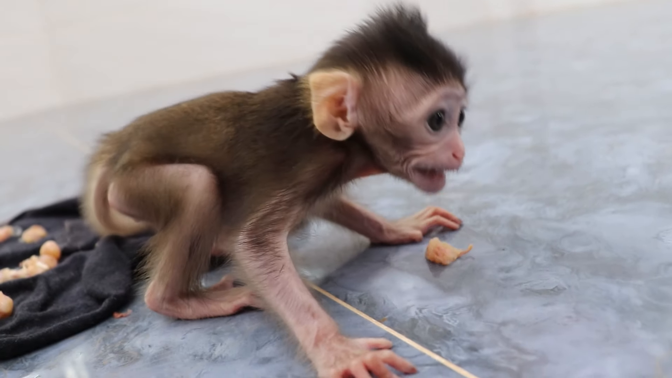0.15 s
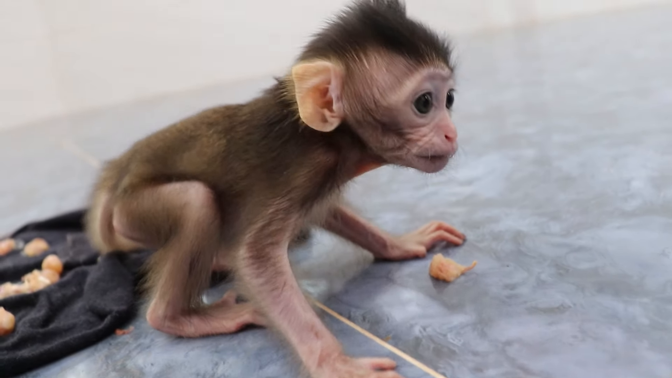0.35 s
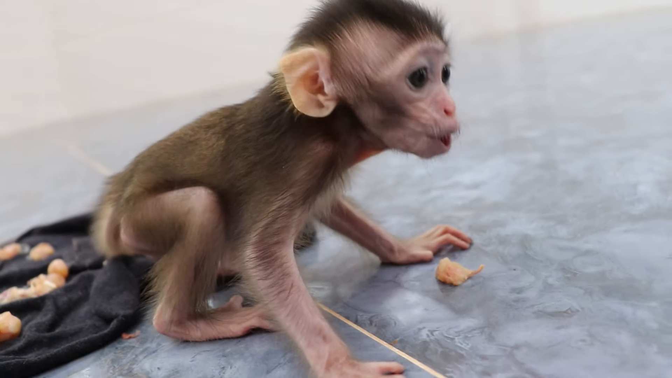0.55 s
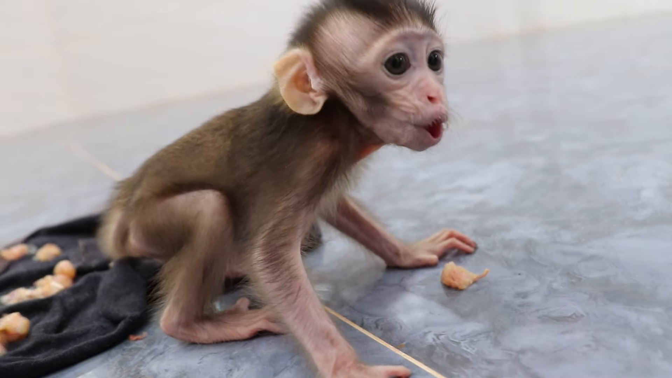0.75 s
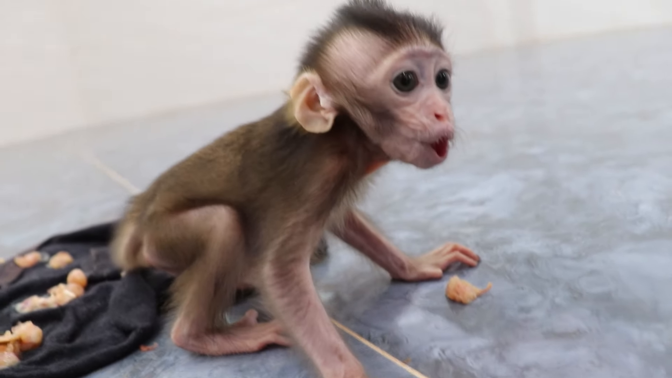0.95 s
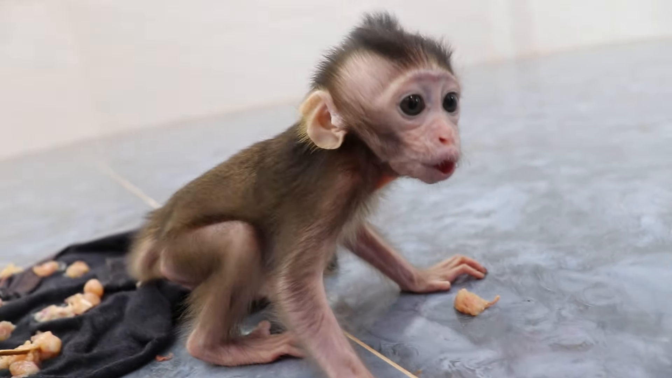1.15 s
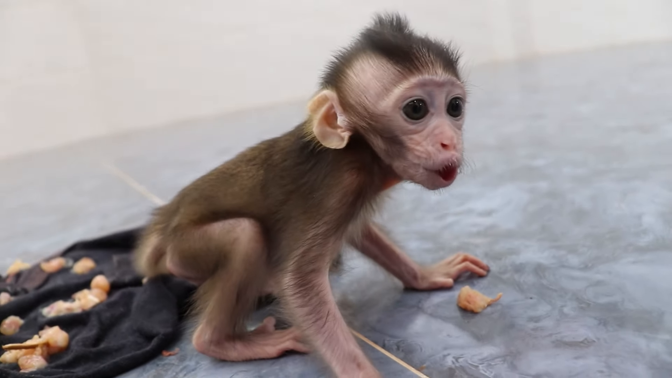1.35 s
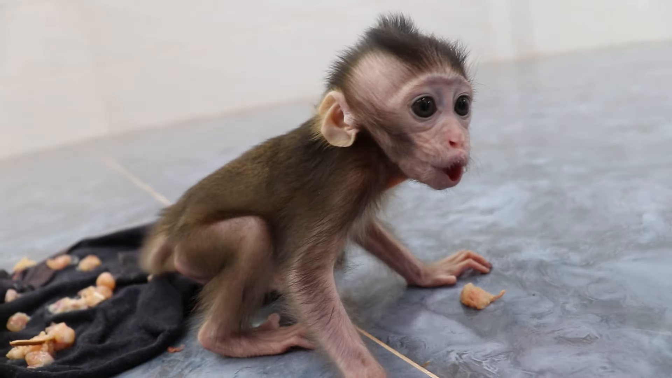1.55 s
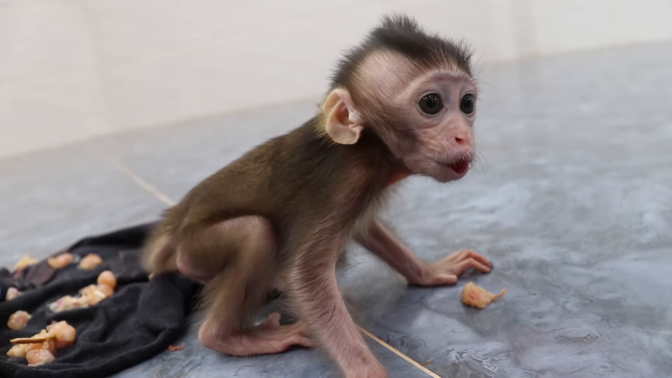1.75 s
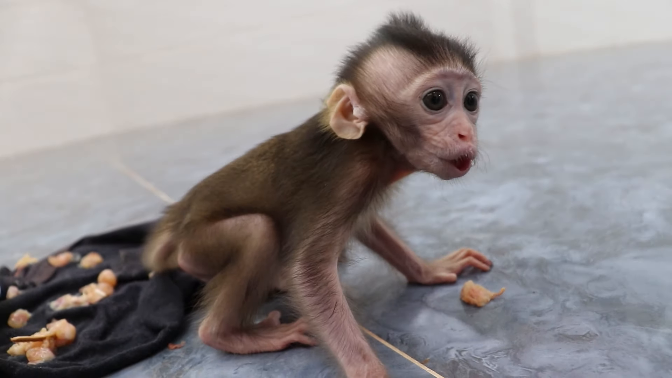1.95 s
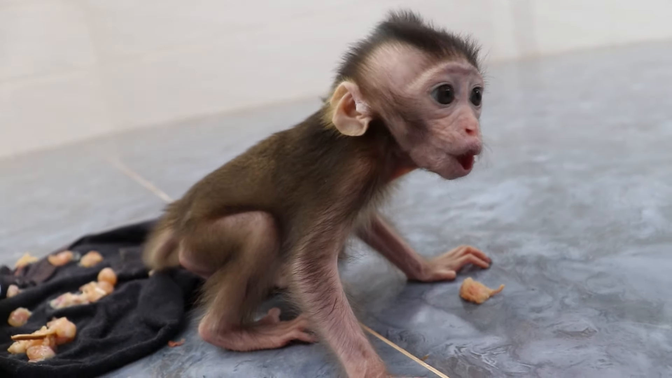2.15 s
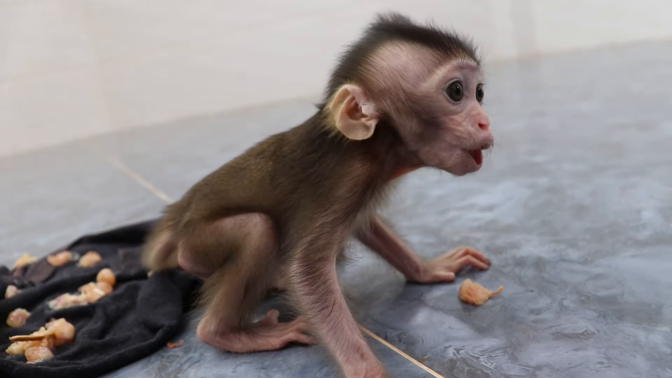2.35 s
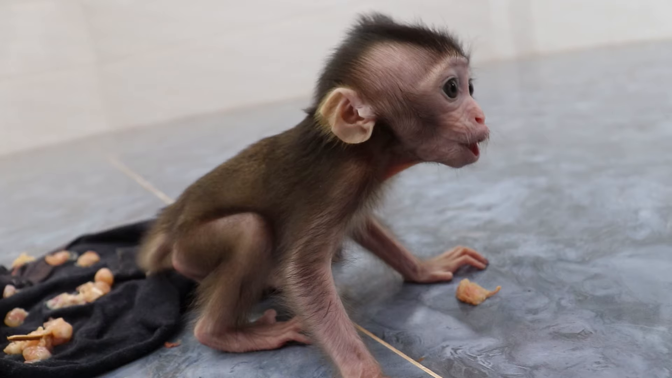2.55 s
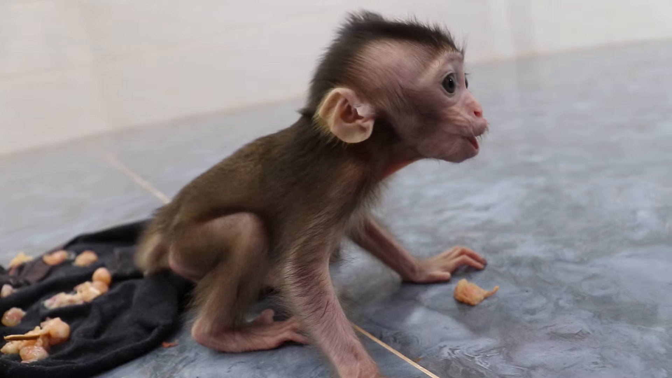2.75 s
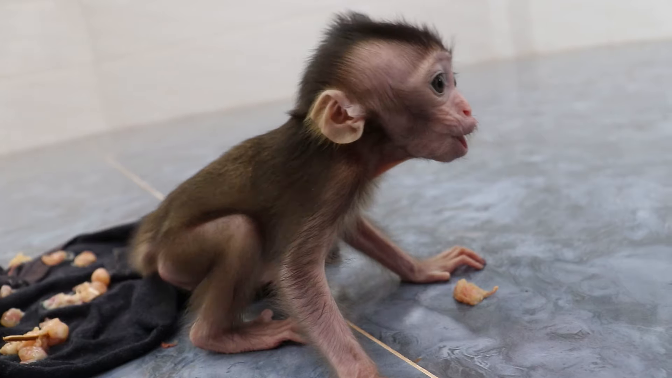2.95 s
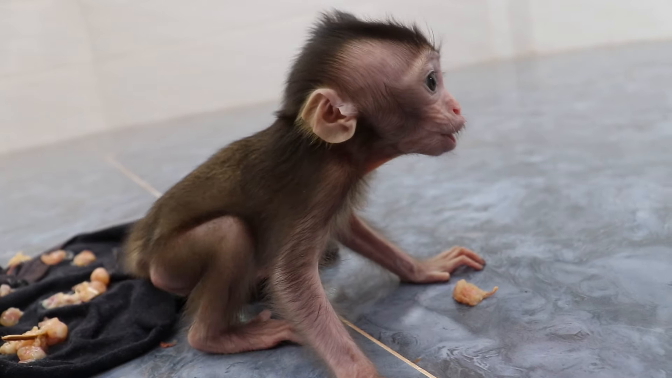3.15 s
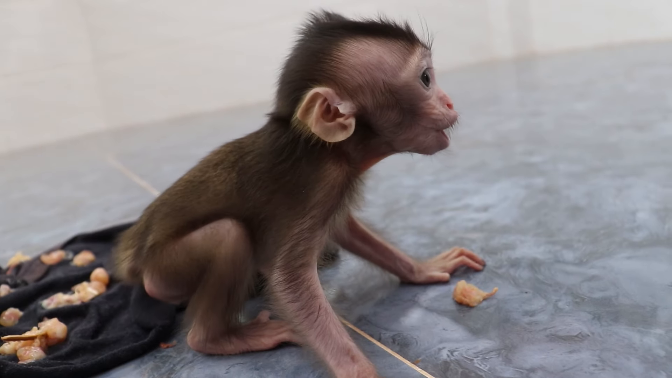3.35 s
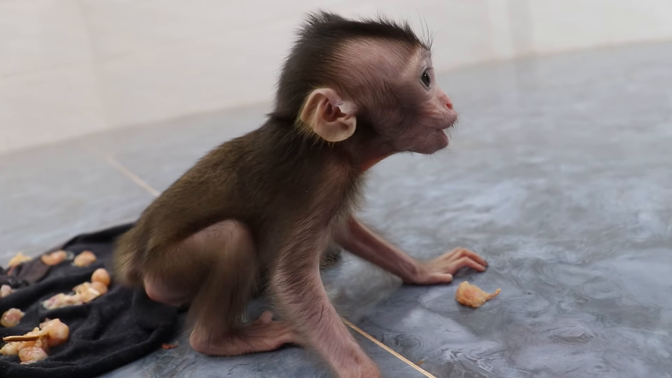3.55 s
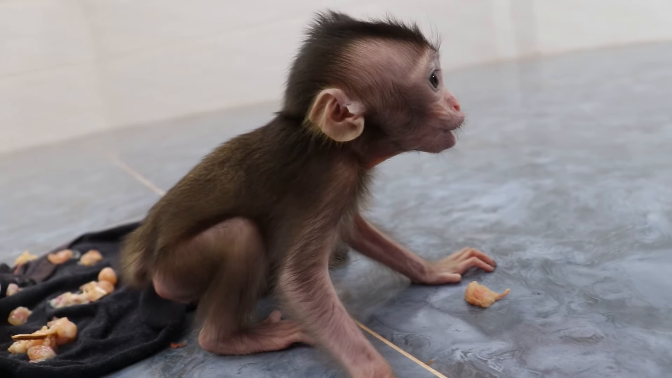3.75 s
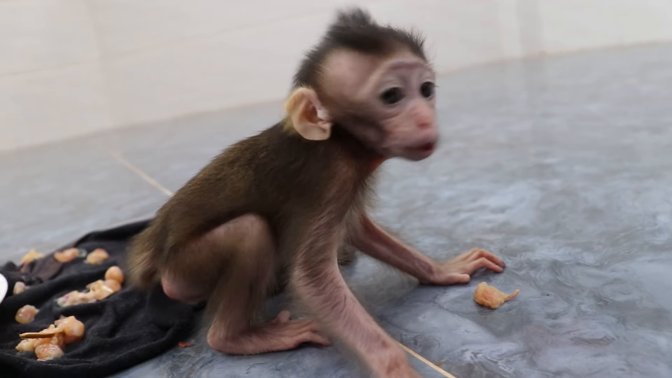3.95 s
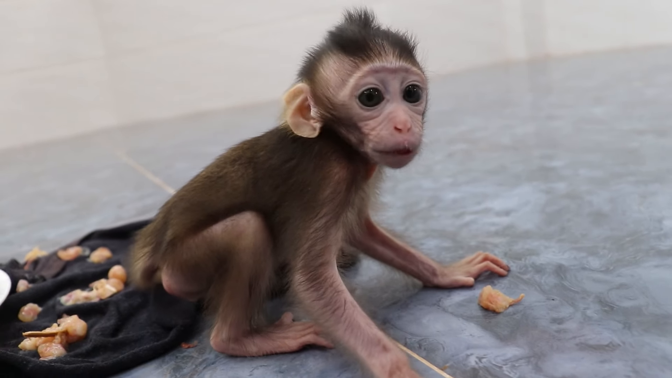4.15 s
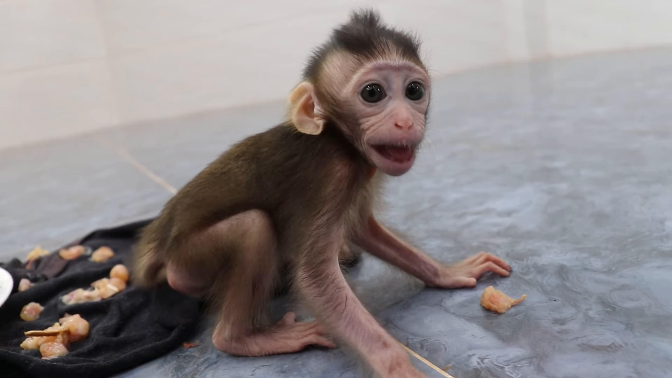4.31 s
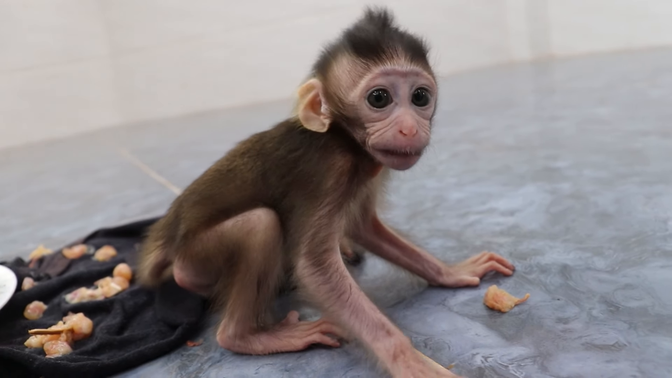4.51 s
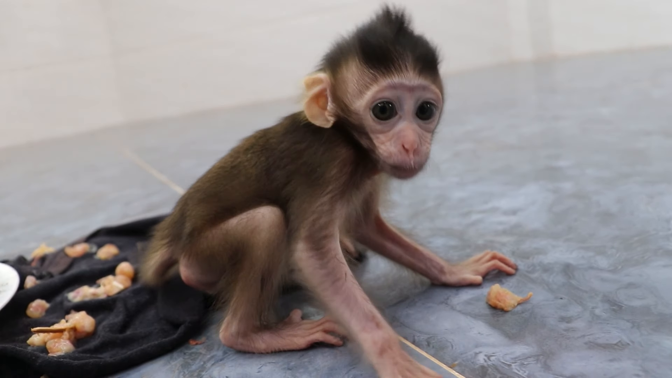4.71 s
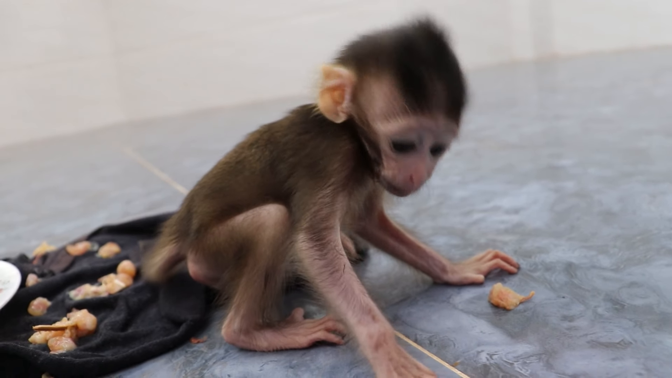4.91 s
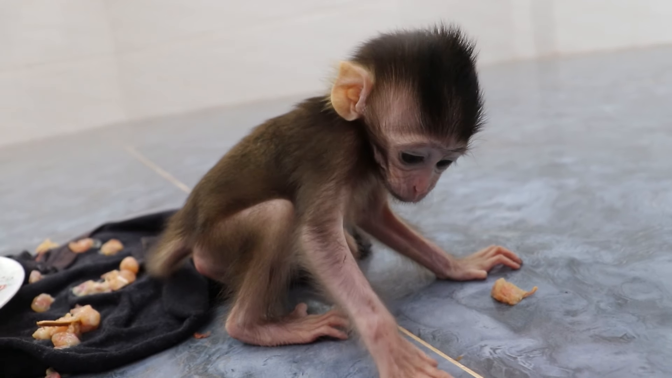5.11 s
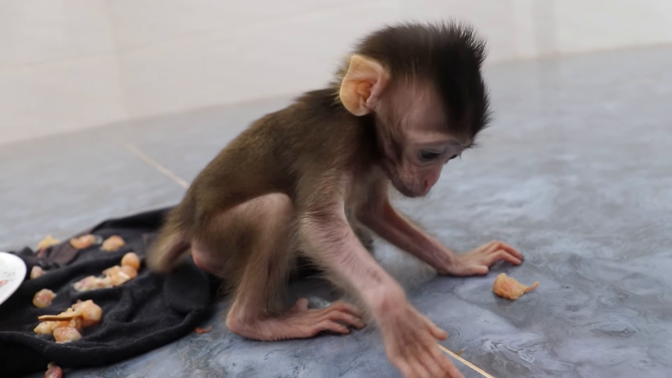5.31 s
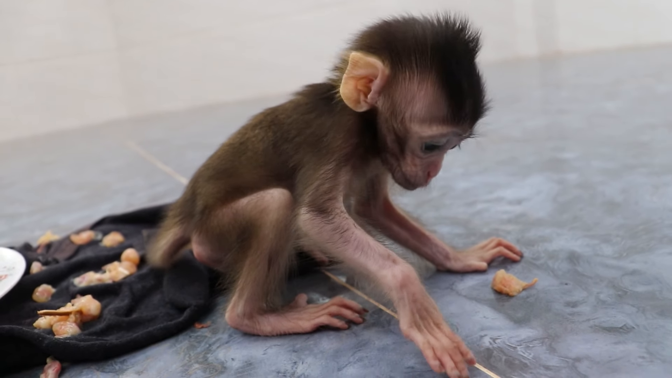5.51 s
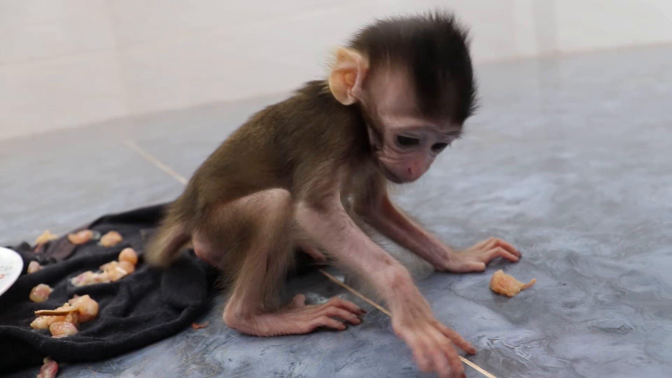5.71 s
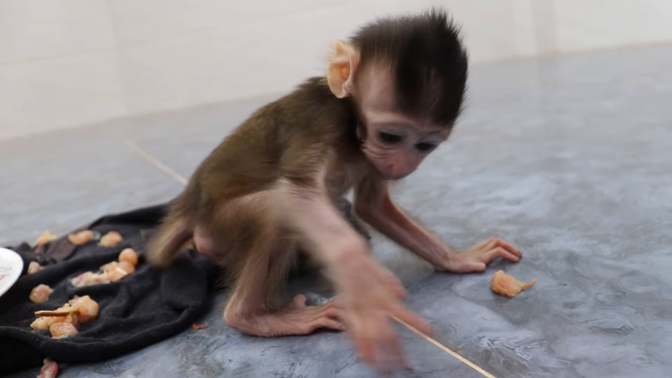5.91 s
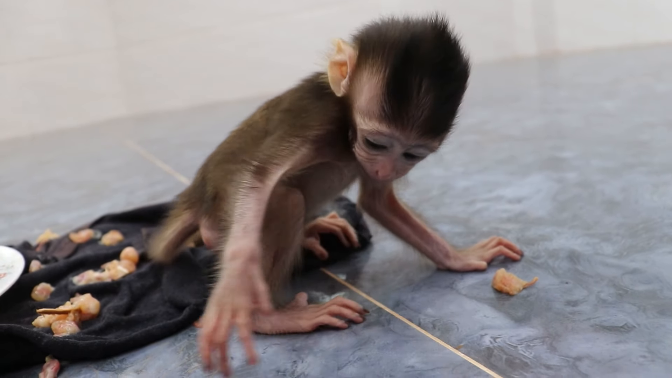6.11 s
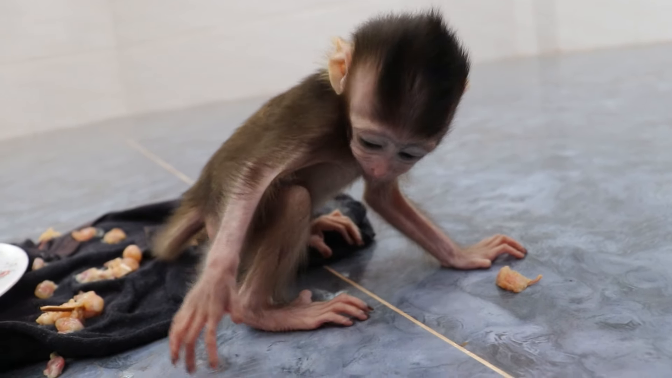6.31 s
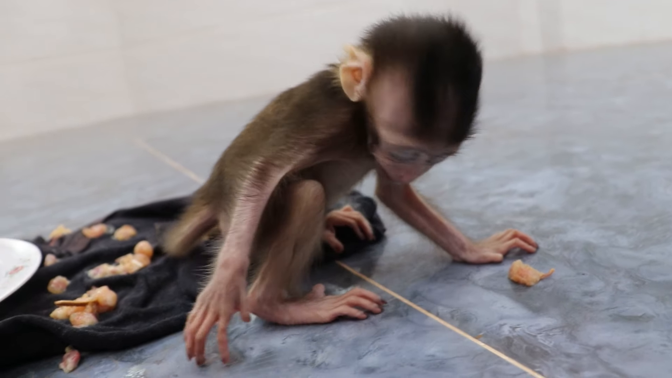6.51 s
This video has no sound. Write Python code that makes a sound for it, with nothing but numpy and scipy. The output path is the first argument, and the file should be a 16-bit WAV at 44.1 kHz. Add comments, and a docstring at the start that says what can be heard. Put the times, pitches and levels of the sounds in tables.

```python
"""A baby monkey on the tiled floor of a bare room first sneezes with a hiss, a pip and falling chirps.
Next come five whistled coos, each after an intake of breath: fold tones coloured by the mouth, with breath noise.
Then it mixes pips, a chirp and more sneezes (noise through mouth resonances) with faint lip and finger ticks.
Throughout, the room rings on (fading noise) over a low rumble, a hum and a far hiss that swells once near the end.
Two close microphones with gain control listen."""
import sys
import numpy as np
from scipy import signal
from scipy.fft import rfft, irfft
from scipy.io import wavfile
from scipy.ndimage import uniform_filter1d

SR = 44100
rng = np.random.default_rng(int(sys.argv[2]) if len(sys.argv) > 2 else 0)


def int16_out(signal):
    """Quantize to a 16-bit WAV file."""
    q = np.round(np.clip(np.atleast_2d(signal).T, -1, 1) * 32767)
    wavfile.write(sys.argv[1], SR, q.astype(np.int16))


def magnitude_from_level(level_db):
    """Linear magnitude for a level in decibels (20 dB per decade)."""
    exponent = np.asarray(level_db, float) / 20
    return 10 ** exponent


N = 289737
TREBLE_TOP_HZ = 16500   # voice harmonics above this pitch are left out


def rms_one(x):
    """Scale to rms 1."""
    return x / np.sqrt(np.mean(x ** 2) + 1e-20)


def at_hz(points, hz, column=1):
    """Read a table on a log-frequency axis."""
    points = np.array(points)
    return np.interp(np.log(np.maximum(hz, 1)), np.log(points[:, 0]), points[:, column])


def over_time(points):
    """Read a (time, value) table at every sample of the scene."""
    return np.interp(np.arange(N) / SR, *np.transpose(points))


def stretch(rows):
    """Give the sample numbers of a sound and its table columns, filled in sample by sample."""
    s, *columns = np.transpose(rows)
    at = np.arange(int(min(s) * SR), min(int(max(s) * SR), N))
    return at, [np.interp(at / SR, s, c) for c in columns]


def coloured(points, size):
    """Noise whose spectrum follows a (frequency, dB per Hz) table, at rms 1."""
    hz = np.fft.rfftfreq(size[-1], 1 / SR)
    spectrum = rfft(rng.standard_normal(size)) * magnitude_from_level(at_hz(points, hz))
    return rms_one(irfft(spectrum, size[-1]))


def resonate(x, hz, width_hz):
    """Two-pole resonance, gain 1 on top."""
    r = np.exp(-np.pi * width_hz / SR)
    top_gain = [(1 - r * r) / 2, 0, (r * r - 1) / 2]
    return signal.lfilter(top_gain, [1, -2 * r * np.cos(2 * np.pi * hz / SR), r * r], x)


def drift(rate_hz, size):
    """Smooth random wandering of rms 1; a higher rate wanders faster."""
    r = np.exp(-2 * np.pi * rate_hz / SR)
    wander = signal.lfilter([1], [1, -2 * r, r * r], rng.standard_normal(size + 4000))
    return rms_one(wander[4000:])


def fade(size, s=.001):
    """Edges of a sound open and close smoothly over s seconds."""
    n = np.arange(size)
    return np.clip(np.minimum(n, size - 1 - n) / (s * SR), 0, 1)


# The coos, one curve each:
# (time [s], pitch [Hz], 1st harmonic [dB], upper harmonics over the 1st [dB])
COO_CURVES = [
    [(0.7, 1206, -31.5, -37), (0.714, 1248, -24, -35), (0.774, 1284, -20.5, -40.5), (0.814, 1331, -17, -42),
     (0.854, 1329, -15, -44), (0.886, 1378, -19.5, -36), (0.924, 1412, -14.5, -31),
     (0.97, 1425, -15.5, -22.5), (1.08, 1515, -15.5, -21), (1.114, 1499, -15.5, -24.5),
     (1.148, 1479, -15.5, -28.5)],
    [(1.502, 1360, -26, -31.5), (1.524, 1441, -24, -31), (1.556, 1460, -21.5, -36),
     (1.596, 1494, -21.5, -29), (1.608, 1528, -20, -30.5), (1.646, 1508, -21.5, -23),
     (1.68, 1514, -19, -26.5), (1.694, 1528, -21, -17), (1.722, 1543, -13, -28.5), (1.752, 1524, -15, -30),
     (1.765, 1512, -18.5, -28)],
    [(2.147, 1450, -28.5, -38), (2.167, 1475, -22.5, -32), (2.201, 1476, -23, -33.5),
     (2.243, 1571, -20, -33), (2.295, 1527, -19.5, -25), (2.309, 1519, -26, -20), (2.335, 1540, -18.5, -28),
     (2.357, 1544, -18, -26), (2.403, 1565, -17.5, -21), (2.431, 1613, -23.5, -19.5),
     (2.46, 1551, -16.5, -31.5)],
    [(2.8, 1395, -30.5, -36), (2.826, 1392, -24.5, -31.5), (2.86, 1421, -21.5, -44),
     (2.9, 1482, -19.5, -44), (2.92, 1500, -19, -31), (2.93, 1466, -20, -30.5), (2.946, 1449, -19, -36),
     (2.992, 1467, -19.5, -30), (3.012, 1486, -17.5, -22), (3.092, 1556, -16.5, -21),
     (3.14, 1498, -19, -25.5)],
    [(3.484, 1757, -29, -32), (3.502, 1917, -22, -28), (3.516, 1946, -28.5, -15), (3.55, 1954, -18.5, -38),
     (3.578, 1940, -32, -17), (3.59, 1963, -21, -20), (3.6, 1958, -21, -18), (3.672, 1743, -21, -32.5),
     (3.734, 1638, -21.5, -28), (3.792, 1626, -21.5, -17.5), (3.828, 1573, -20.5, -26)],
]
# How much of each coo goes into the room, one number per coo: [dB]
COO_TO_ROOM_DB = [-5, -3, -2.5, -2, 1.5]
# Level change by the end of the closing drop: 1st harmonic, upper harmonics [dB]
COO_DROP_DB = [-20.5, -14]
# Throat colour of the 2nd and 3rd harmonics: (frequency [Hz], level over the 1st [dB])
THROAT_COLOUR = [(2400, -31), (2700, -15), (3000, -11), (3300, -8), (3900, 4.5), (4250, 0.5), (4600, -8.5),
                 (5000, 0.5), (5700, -40)]
# Mouth colour of the harmonics above the third: (frequency [Hz], level [dB])
MOUTH_COLOUR = [(3000, -12.5), (5000, -32), (6800, -17), (8000, -11.5), (9000, 3), (10000, -1.5),
                (11000, -15), (13000, -22), (16000, -33)]
# Faint overtones that follow the 1st harmonic: (frequency [Hz], level over it [dB])
FOLD_OVERTONES = [(4500, -22), (6200, -44.5), (7500, -48), (9500, -41), (12000, -45.5), (16000, -60)]
# Colour of the breath noise: (frequency [Hz], level [dB per Hz])
BREATH_COLOUR = [(800, -53), (1800, 2.5), (2400, -10.5), (3800, 6.5), (5000, -9.5), (6800, -31),
                 (9000, -2.5), (11000, -19), (16000, -26)]


def coo_outline(rows):
    """A coo opens soft at a slightly lower pitch and closes with a drop that steepens, then shuts."""
    open_s, open_share, open_db = 0.0099, 0.94, -31
    fall_s, fall_share, shut_s = .021, .81, .004
    first_db, upper_db = COO_DROP_DB
    start = rows[0] * [1, open_share, 1, 1] + [-open_s, 0, open_db, 0]
    end = rows[-1] * [1, fall_share, 1, 1] + [fall_s, 0, first_db, upper_db - first_db]
    bend = rows[-1] + (end - rows[-1]) * [0.45, 0.28, 0.29, 0.17]
    shut = end + [shut_s, -40, -40, 0]
    return [start, *rows, bend, end, shut], start[0], start[0] + open_s


def coo_tone(hz, phase, first, upper, age_s):
    """Vocal folds whistle almost purely; throat and mouth lift harmonics near 4 and 9 kHz."""
    second = first + at_hz(THROAT_COLOUR, 2 * hz)
    # the folds give the 3rd less than the 2nd, and 16 dB less per second as the coo goes on
    third = first - 17.5 - 16 * age_s + at_hz(THROAT_COLOUR, 3 * hz)
    levels = [first, second, third]
    for k in range(4, 13):
        mouth = upper + at_hz(MOUTH_COLOUR, k * hz)
        folds = first + at_hz(FOLD_OVERTONES, k * hz)
        levels.append(np.maximum(mouth, folds) - 200 * (k * hz > TREBLE_TOP_HZ))
    tone = 0
    for k, level_db in enumerate(levels, 1):
        shimmer_db = 1.0 if k < 3 else 3.0   # harmonics above the 2nd waver and break more
        strength = np.sqrt(2) * magnitude_from_level(level_db + shimmer_db * drift(26, len(hz)))
        tone = tone + strength * np.sin(k * phase - 0.91 * (k - 1))
    return tone


def coo_air(phase, upper):
    """Air rasps in the high mouth resonance, and breath pulses with each cycle of the folds."""
    size = len(phase)
    rasp_hz, rasp_width_hz = 9470, 600
    rasp = resonate(rng.standard_normal(size), rasp_hz, rasp_width_hz)
    rasp = magnitude_from_level(upper - 9) * rms_one(resonate(rasp, rasp_hz, rasp_width_hz))
    # breath follows about half of the dB swing of the upper harmonics
    breath = magnitude_from_level(-20.5 + 0.52 * upper) * coloured(BREATH_COLOUR, (size,))
    return rasp + breath * (1 + .5 * np.sin(phase)) * fade(size, s=0.009)


def coos():
    """Fold tone plus air, led in by a faint intake of breath. Rows: to microphones, into room."""
    out = np.zeros((2, N))
    for rows, room_db in zip(COO_CURVES, COO_TO_ROOM_DB):
        outline, start_s, opened_s = coo_outline(np.array(rows, float))
        at, (hz, first, bright_db) = stretch(outline)
        upper = first + bright_db
        hz = hz * (1 + 0.0025 * drift(76, len(at)))   # pitch jitter
        phase = 2 * np.pi * np.cumsum(hz) / SR
        call = coo_tone(hz, phase, first, upper, (at - at[0]) / SR) + coo_air(phase, upper)
        out[:, at] += call * magnitude_from_level([[0], [room_db]])
        # an indrawn breath rises by 16 dB before the folds sound
        at, (inhale_db,) = stretch([(start_s - 0.16, -67.5), (opened_s, -51.5)])
        out[:, at] += magnitude_from_level(inhale_db) * coloured(BREATH_COLOUR, (len(at),))
    return out


def pinched(hz, level_db, second_db, higher_db):
    """Pinched folds: an unsteady tone with a few harmonics."""
    phase = 2 * np.pi * np.cumsum(hz * (1 + 0.02 * drift(550, len(hz)))) / SR
    overtones = [0, second_db, higher_db - 4, higher_db, higher_db - 6, higher_db - 12]
    tone = 0
    for k, relative_db in enumerate(overtones, 1):
        strength = np.sqrt(2) * magnitude_from_level(level_db + relative_db) * (k * hz < TREBLE_TOP_HZ)
        tone = tone + strength * np.sin(k * phase)
    return fade(len(hz)) * tone


# The chirps, one falling curve each:
# (time [s], pitch [Hz], level [dB], 2nd harmonic over the 1st [dB])
CHIRP_CURVES = [
    [(.148, 4800, -40, -8), (.151, 4300, -25, -6), (.156, 3300, -24, -25), (.161, 2650, -16, -25),
     (.167, 1850, -27, -15), (.175, 1450, -33, -15), (.181, 1500, -40, -15)],
    [(.200, 10600, -52, -40), (.203, 10300, -45, -40), (.209, 7200, -44, -40), (.213, 6500, -47, -40)],
    [(5.916, 3300, -40, -12), (5.918, 3150, -22, -12), (5.925, 2690, -19, 5), (5.930, 2500, -22, 6),
     (5.9325, 1500, -24, -8), (5.936, 1250, -27, -8), (5.939, 900, -45, -6)],
]
# How much of each chirp goes into the room, one number per chirp: [dB]
CHIRP_TO_ROOM_DB = [-4.5, -15, 1.5]
# Base level of the harmonics above the 2nd, one number per chirp: over the 1st [dB]
CHIRP_OVERTONES_DB = [-30, -40, -13.5]


def chirps():
    """Pinched folds glide down in pitch. Rows: towards the microphones, into the room."""
    out = np.zeros((2, N))
    for rows, room_db, higher_db in zip(CHIRP_CURVES, CHIRP_TO_ROOM_DB, CHIRP_OVERTONES_DB):
        at, (hz, level, second) = stretch(rows)
        out[:, at] += pinched(hz, level, second, higher_db) * magnitude_from_level([[0], [room_db]])
    return out


# The pips, brief and nearly steady:
# (start [s], length [s], middle pitch [Hz], level in the middle [dB], sent to the room [dB])
PIP_LIST = [(0.143, 0.029, 4775, -25, 17.5), (4.3674, 0.0055, 3430, -31, -2),
            (4.376, 0.0095, 3670, -29, -2), (4.415, 0.0063, 3963, -13.5, 4),
            (5.9107, 0.0024, 4190, -16, -5), (6.2312, 0.0051, 3870, -13, -4), (6.501, .010, 5290, -14, 2)]


def pips():
    """Pinched folds swell, sag a little in pitch and stop. Rows: to the microphones, into the room."""
    sag, edge_db = 0.056, -5   # share of pitch lost; level at both ends over the middle
    out = np.zeros((2, N))
    for s, length, hz, middle_db, room_db in PIP_LIST:
        at, (place,) = stretch([(s, -1), (s + length, 1)])
        pitch = hz * (1 - sag * place / 2)
        tone = pinched(pitch, middle_db + edge_db * place ** 2, second_db=-23.5, higher_db=-23)
        out[:, at] += tone * magnitude_from_level([[0], [room_db]])
    return out


# The sneezes, air forced through the teeth:
# (start [s], length [s], level [dB], treble tilt [dB per octave], sent to the room [dB])
SNEEZE_LIST = [(0.139, 0.035, -26, -7.5, 5.5), (4.386, 0.031, -13, 1, 6.5), (5.908, 0.044, -34, -24.5, -6),
               (6.236, 0.024, -30, -5.5, 2), (6.471, 0.036, -12, 1.5, 3)]
# Mouth resonances of a sneeze: (frequency [Hz], width [Hz], level before the tilt [dB])
TEETH_RESONANCES = [(2800, 1200, -12), (4300, 1500, -6), (5500, 1200, -6), (7600, 1300, 0),
                    (9100, 1300, -4), (10400, 1300, -1), (12300, 2000, -3), (13800, 2000, -3),
                    (15500, 1500, -1)]


def sneezes():
    """Turbulent air, fluttering, rings each mouth resonance with a wavering strength."""
    attack_s, release_s, edge_db, flutter_db = .005, 0.0032, -27, 2.45
    no_bass = signal.butter(2, 2200, "high", fs=SR, output="sos")   # a small mouth radiates no bass
    out = np.zeros((2, N))
    for s, length, level_db, tilt, room_db in SNEEZE_LIST:
        end = s + length
        at, (shape_db,) = stretch([(s, edge_db), (s + attack_s, 0), (end - release_s, 0), (end, edge_db)])
        jet = rng.standard_normal(len(at)) * magnitude_from_level(flutter_db * drift(430, len(at)))
        rung = 0
        for k, (hz, width, db) in enumerate(TEETH_RESONANCES):
            strength = magnitude_from_level(db + tilt * np.log2(hz / 7000) + flutter_db * drift(73, len(at)))
            rung = rung + (-1) ** k * resonate(jet, hz, width) / np.sqrt(width) * strength
        hiss = rms_one(signal.sosfilt(no_bass, rung))
        out[:, at] += magnitude_from_level(level_db + shape_db) * hiss * fade(len(at)) * magnitude_from_level([[0], [room_db]])
    return out


# The ticks of lips, nails and crumbs: (time [s], ring level [dB], ring pitch [Hz], crack level [dB])
TICK_LIST = [(0.1353, -22, 2570, -11), (.508, -32.5, 660, -35), (0.584, -34, 817, -27),
             (2.165, -29, 503, -49), (4.292, -28, 2486, -36), (4.317, -33, 940, -34),
             (4.363, -14, 3280, -23.5), (4.438, -36.5, 730, -67), (4.984, -42, 1700, -60),
             (5.063, -32, 3200, -46), (5.309, -33, 990, -36), (5.5628, -36.5, 520, -30.5),
             (5.683, -38, 413, -42), (5.699, -35, 2680, -40), (5.751, -37, 3920, -39.5),
             (5.97, -17.5, 520, -35), (6.2205, -16, 5030, -16.5), (6.2403, -28, 1160, -52),
             (6.4726, -25.5, 1350, -21), (6.523, -34.5, 523, -63)]


def ticks():
    """A small object rings in two modes and dies within 15 cycles, with a short crack of noise on top."""
    out, t = np.zeros(N + 4000), np.arange(3000) / SR
    for s, ring_db, hz, crack_db in TICK_LIST:
        modes = np.sin(2 * np.pi * hz * t) + magnitude_from_level(-11) * np.sin(2 * np.pi * 1.8 * hz * t)
        dying = magnitude_from_level(ring_db - 60 * t * hz / 15)
        ring = dying * modes * np.clip(t * hz, 0, 1)   # swells over one cycle
        noise = resonate(rng.standard_normal(len(t)), 3000, 6000)
        crack = magnitude_from_level(crack_db - 60 * t / .005) * noise   # loses 60 dB in 5 ms
        out[round(s * SR):][:len(t)] += ring + crack
    return out[:N] * magnitude_from_level([[0], [-1]])   # rows: towards the microphones, into the room


# Balance of the microphones by pitch: (frequency [Hz], left over right [dB])
PORT_BALANCE = [(500, -2.5), (1300, -0.5), (2500, -7), (4400, -1), (8000, 5), (14000, -1)]
# How far the left is ahead by pitch: (frequency [Hz], lead [radians])
PORT_LEAD = [(100, .03), (1500, 0.6), (3000, 0.97), (5500, 1.45), (8000, 1.78), (11000, 1.52), (16000, 2.5)]
# The head turns: (time [s], left over right, on top of the balance by pitch [dB])
HEAD_TURNS = [(0, 4.5), (1.0, 0), (2.0, 4), (3.598, 0.5), (4.4, 3), (6.0, 1), (6.5, 2)]


def direct(x):
    """The microphone ports shade each other: left leads, and balance shifts with pitch and head."""
    hz = np.fft.rfftfreq(N, 1 / SR)
    half = magnitude_from_level(at_hz(PORT_BALANCE, hz) / 2) * np.exp(.5j * at_hz(PORT_LEAD, hz))
    pan_db = over_time(HEAD_TURNS)
    return irfft(rfft(x) * [half, 1 / half], N) * magnitude_from_level([pan_db / 2, -pan_db / 2])


# How the room rings: (frequency [Hz], time to fade by 60 dB [s], level [dB])
ROOM_RINGING = [(302.6, 0.48, -12), (1620, 0.85, -3), (2840, 0.7, -6), (4780, 0.69, -13), (8150, 0.74, -12),
                (11860, 0.56, -15), (16200, 0.91, -37)]


def room(x):
    """Dense echoes build after a short gap and die band by band, unrelated at the two microphones."""
    gap_s, rise_s = 0.0011, 0.0048
    wall_s, wall_spread_s, wall_db = 0.071, 0.039, -13
    t, edges, tail = np.arange(SR) / SR, 200 * 2 ** np.arange(0, 6.6, .5), 0
    rise = np.clip((t - gap_s) / rise_s, 0, 1) ** .5
    # the far wall answers in a clump
    rise = rise + magnitude_from_level(wall_db) * np.exp(-((t - wall_s) / wall_spread_s) ** 2)
    for low, high in zip(edges, edges[1:]):
        hz = np.sqrt(low * high)
        band_filter = signal.butter(2, [low, high], "band", fs=SR, output="sos")
        band = signal.sosfilt(band_filter, rng.standard_normal((2, SR)))
        shape = rise * magnitude_from_level(-60 * t / at_hz(ROOM_RINGING, hz))
        level = magnitude_from_level(at_hz(ROOM_RINGING, hz, column=2))
        tail = tail + band * shape / np.sqrt(np.sum(shape ** 2)) * level
    return signal.fftconvolve(x[None], tail, axes=1)[:, :N]


# Colour of the steady floor noise: (frequency [Hz], level [dB per Hz])
FLOOR_COLOUR = [(15, -42), (25, -25), (102, -2), (309, -9.5), (335, -13), (416, -10.5), (489, -13),
                (607, -11), (818, -13), (1040, -12), (1700, -14.5), (5140, -20.5), (16000, -35)]


def floor_noise():
    """Steady coloured noise lies under everything."""
    return magnitude_from_level(-52) * coloured(FLOOR_COLOUR, (2, N))


# Strength of the rumble: (time [s], level [dB])
RUMBLE_LEVEL = [(0, -57.5), (1.8, -53.5), (3.3, -61.5), (6.57, -58)]


def rumble(white):
    """Noise through one low resonance, slowly swelling."""
    level_db = over_time(RUMBLE_LEVEL) + 0.5 * drift(1.9, N)
    return magnitude_from_level(level_db) * rms_one(resonate(white, 67.2, 9.6))


# Parts of the hum: (frequency [Hz], width [Hz], level [dB])
HUM_PARTS = [(95.8, 4.6, -60), (148.5, 12, -69.5), (177.3, 8.9, -63.5), (209.1, 13, -69.5)]


def hum(white):
    """Noise through narrow low resonances makes a wavering hum."""
    return sum(magnitude_from_level(db) * rms_one(resonate(white, hz, width)) for hz, width, db in HUM_PARTS)


# Strength of the far hiss: (time [s], level [dB])
FAR_HISS_LEVEL = [(0, -52), (1, -60), (4.5, -50), (4.9, -71), (5.8, -61.5), (6.57, -49.5)]
# Colour of the far hiss: (frequency [Hz], level [dB per Hz])
FAR_HISS_COLOUR = [(600, -5), (1000, -6.5), (2600, -2), (4000, -5.5), (5500, -11), (8000, -14.5),
                   (12000, -36), (16000, -57)]
# Whistles inside its one swell: (frequency [Hz], width [Hz], level over the hiss [dB])
WHISTLE_PARTS = [(2540, 30, -3), (5400, 250, -9), (3950, 100, -12), (4450, 80, -14), (1050, 100, -10),
                 (2150, 200, -12), (7300, 300, -13), (8100, 200, -14)]
# Strength of that whistling swell: (time [s], level [dB])
WHISTLING_LEVEL = [(4.95, -104), (5.12, -58.5), (5.45, -53.5), (5.62, -57), (5.85, -76)]


def far_hiss(white):
    """Coloured noise wavers; it swells once together with whistles, which are noise in resonances."""
    hiss = coloured(FAR_HISS_COLOUR, (2, N))
    whistles = 0
    for hz, width, db in WHISTLE_PARTS:
        whistles = whistles + magnitude_from_level(db + 5.5 * drift(8, N)) * rms_one(resonate(white, hz, width))
    steady = magnitude_from_level(over_time(FAR_HISS_LEVEL) + 0.67 * drift(11.0, N)) * hiss
    return steady + magnitude_from_level(over_time(WHISTLING_LEVEL)) * (hiss + whistles)


# A faint far tone: (time [s], pitch [Hz], level before the stereo spread [dB])
FAR_TONE_CURVE = [(1.4, 732, -87), (1.5, 739, -53), (1.65, 705, -59), (1.8, 707, -78)]


def far_tone():
    """A sine bends slightly in pitch and wavers in level, the same at both microphones."""
    out = np.zeros((2, N))
    at, (hz, level) = stretch(FAR_TONE_CURVE)
    out[0, at] = magnitude_from_level(level + 3 * drift(20, len(at))) * np.sin(2 * np.pi * np.cumsum(hz) / SR)
    return out


# How alike left and right are: (frequency [Hz], likeness [0 to 1])
LEFT_RIGHT_LIKENESS = [(60, 1), (180, 0.63), (550, 0.27), (1650, 0.022), (4970, 0.07), (15000, 0.05)]


def stereo(pair):
    """A shared and a differing signal become left and right, alike in the bass."""
    alike = np.clip(at_hz(LEFT_RIGHT_LIKENESS, np.fft.rfftfreq(N, 1 / SR)), 0, 1)
    mid, side = rfft(pair)
    mid, side = mid * np.sqrt(1 + alike), side * np.sqrt(1 - alike)
    return irfft([mid + side, mid - side], N) / np.sqrt(2)


def background():
    """Floor noise, rumble, hum, far hiss and far tone, spread over left and right."""
    white = rng.standard_normal((2, N))
    return stereo(floor_noise() + rumble(white) + hum(white) + far_hiss(white) + far_tone())


def scene():
    """The monkey heard directly and through the room, over the background."""
    near, sent = coos() + chirps() + pips() + sneezes() + ticks()
    return direct(near) + room(sent) + background()


def top_cut(x):
    """Nothing passes above the cut-off."""
    return signal.sosfilt(signal.butter(12, 16870, fs=SR, output="sos"), x)


def record(dry):
    """Gain control dips after loud bright sounds and recovers slowly; then peaks are rounded."""
    knee_db, ratio, top = -26, 0.16, .9   # top: height that rounded peaks approach
    low_pass = signal.cheby2(12, 60, 1.06 * TREBLE_TOP_HZ, fs=SR, output="sos")
    dry = signal.sosfilt(low_pass, dry)
    bright = np.diff(dry, prepend=0)   # differences stress the treble
    level = 10 * np.log10(uniform_filter1d(np.mean(bright ** 2, axis=0), size=200) + 1e-12)
    # the excess over the knee is held and falls by 40 dB per second
    ramp = 40 * np.arange(N) / SR
    held = np.maximum.accumulate(np.maximum(level - knee_db, 0) + ramp) - ramp
    smooth = signal.lfilter([.002], [1, -.998], held)
    gained = dry * magnitude_from_level(-ratio * smooth)
    mix = top * np.tanh(gained / top)
    return top_cut(mix)


dry = scene()
out = record(dry)
int16_out(out)
```